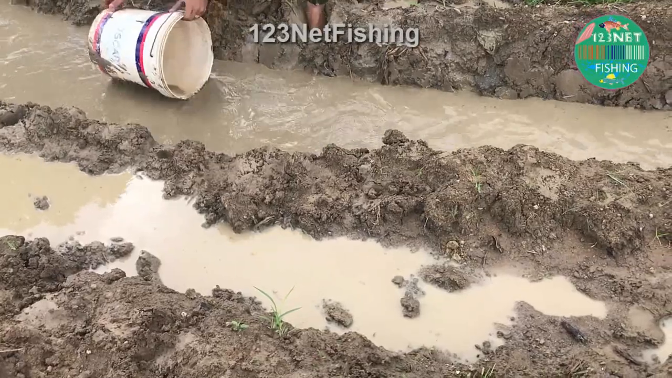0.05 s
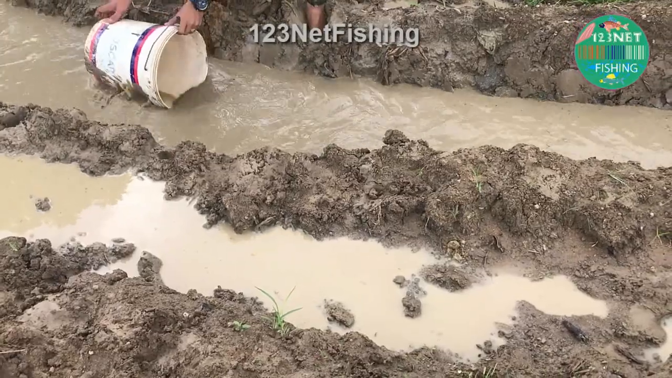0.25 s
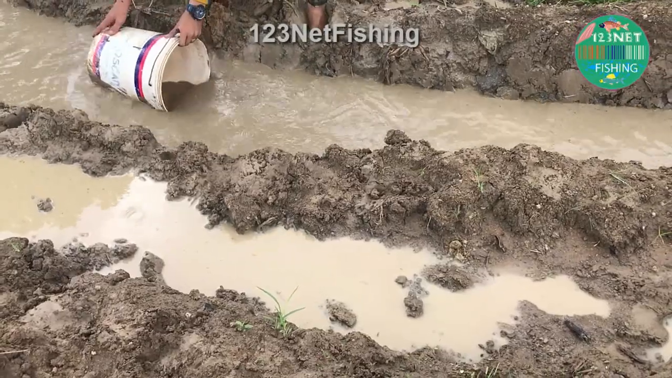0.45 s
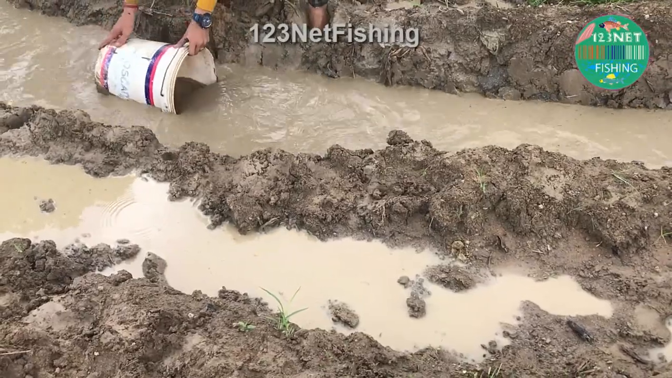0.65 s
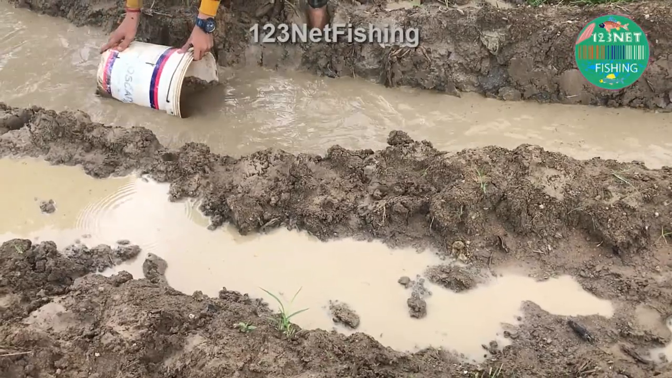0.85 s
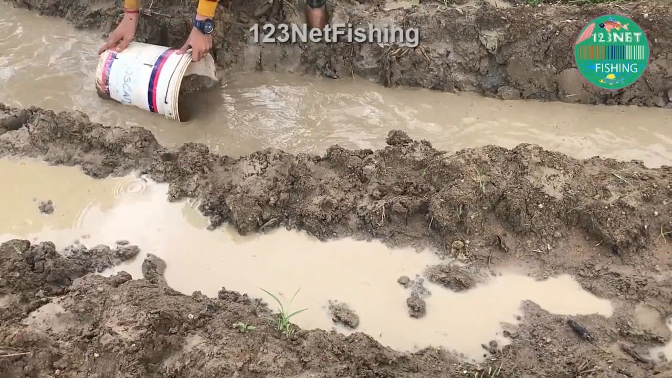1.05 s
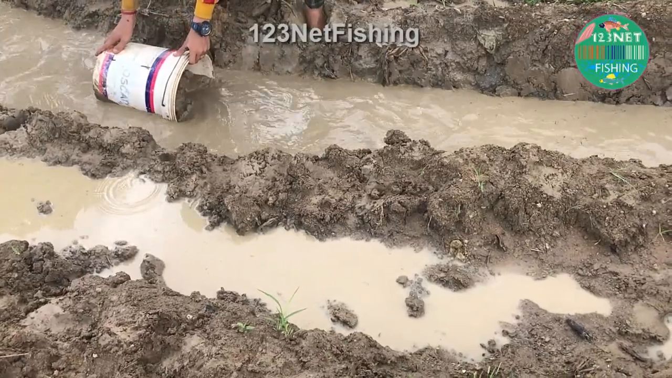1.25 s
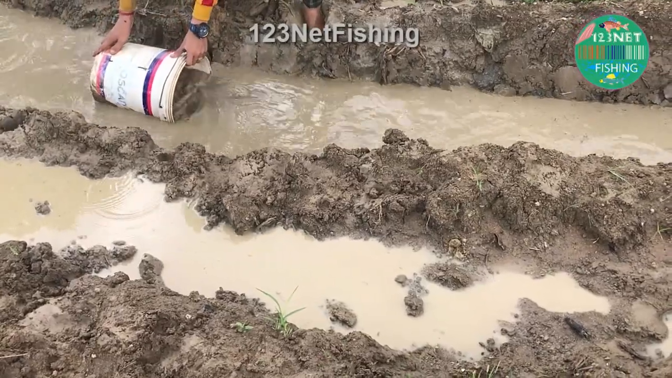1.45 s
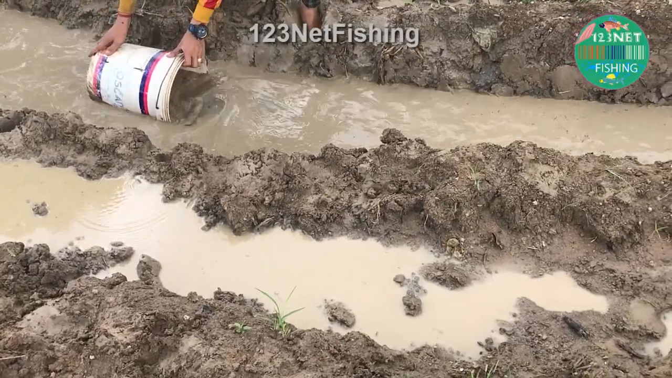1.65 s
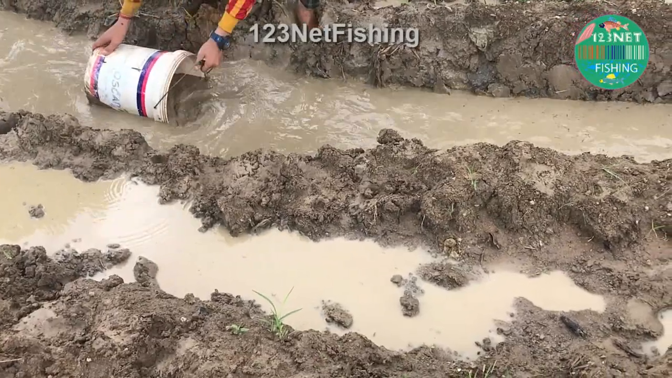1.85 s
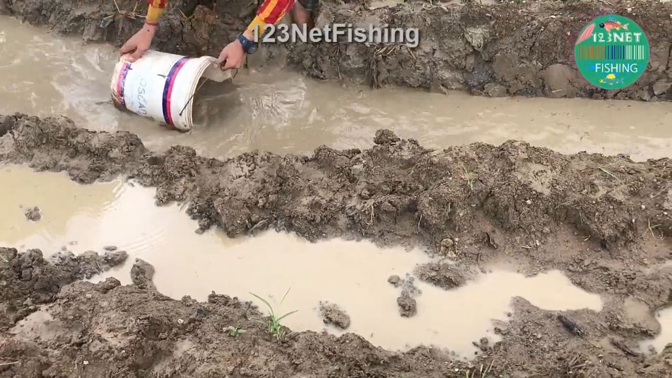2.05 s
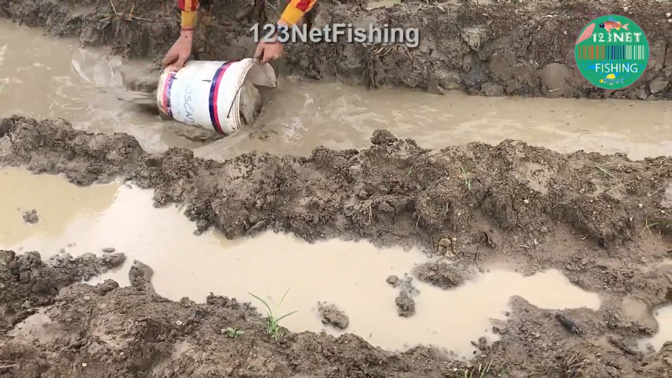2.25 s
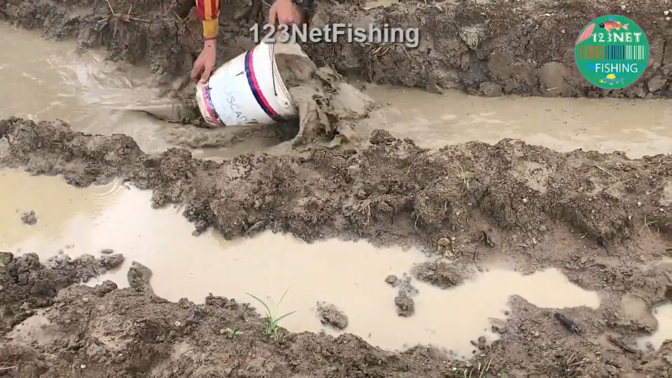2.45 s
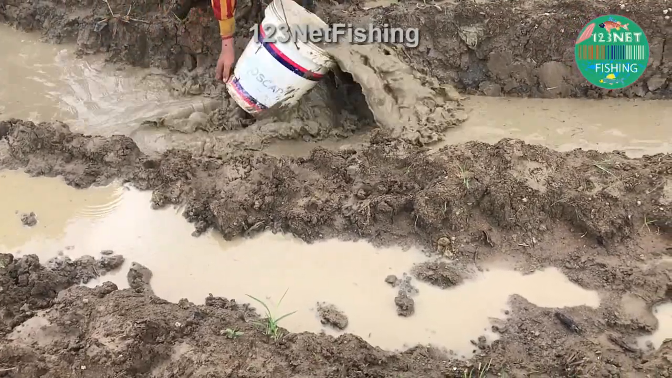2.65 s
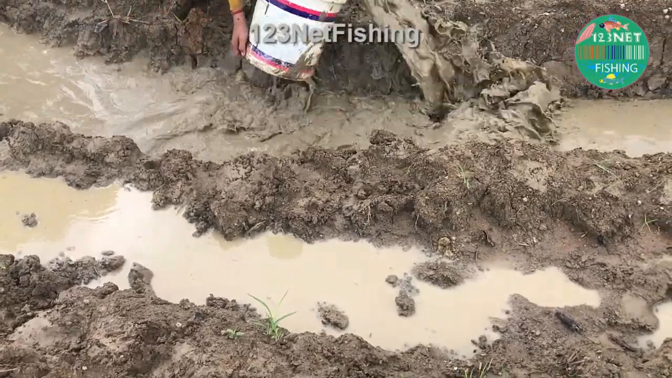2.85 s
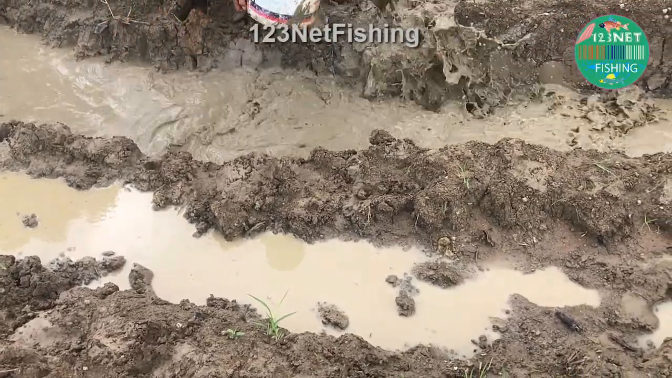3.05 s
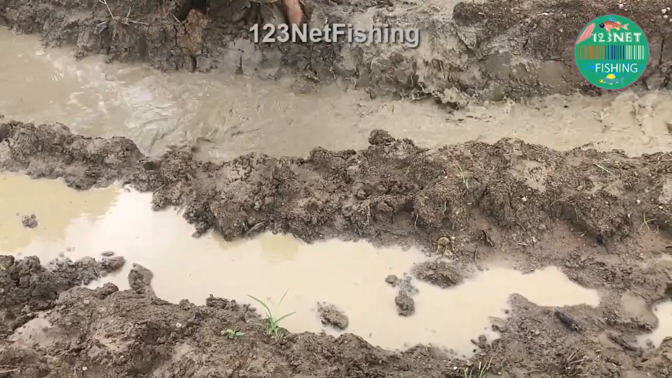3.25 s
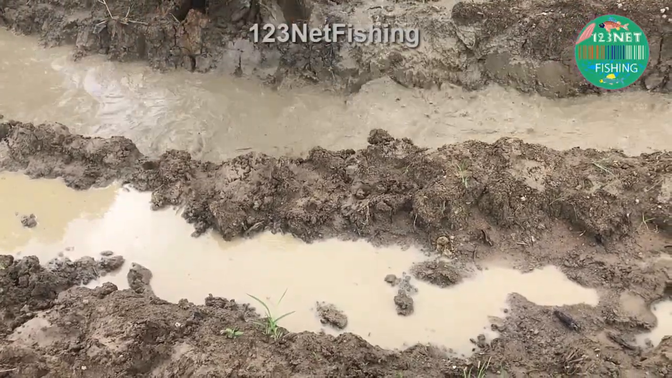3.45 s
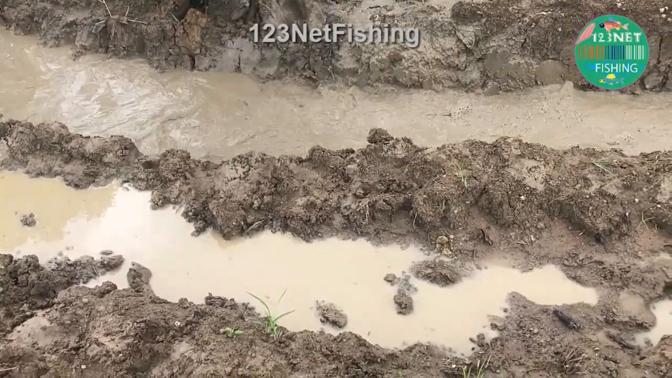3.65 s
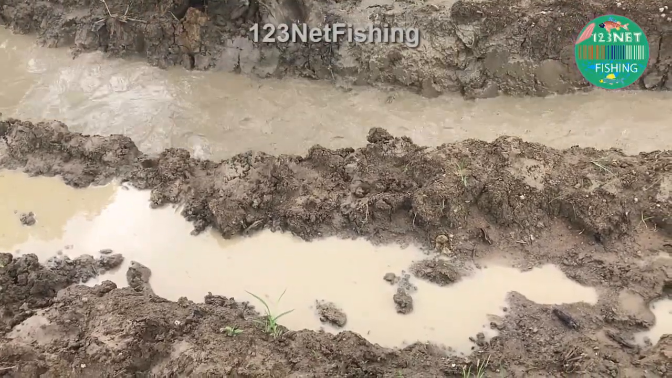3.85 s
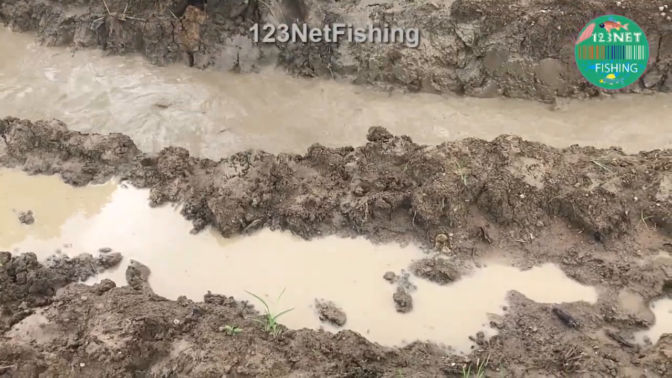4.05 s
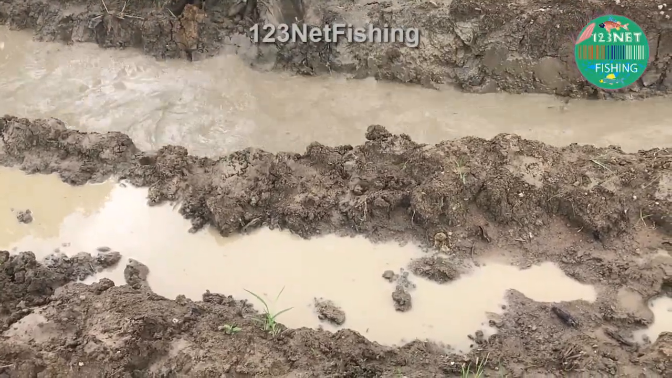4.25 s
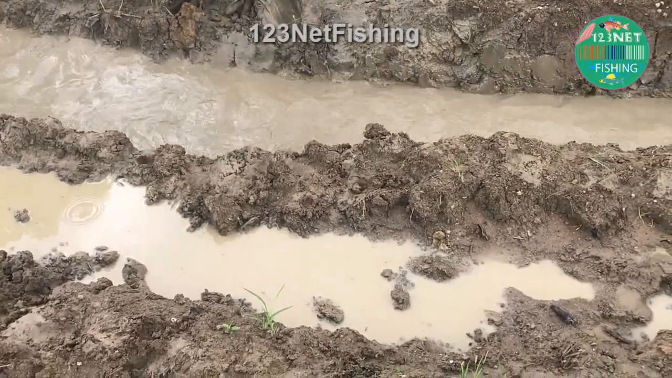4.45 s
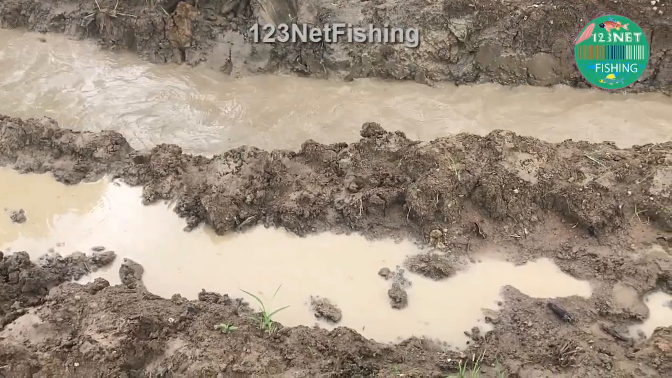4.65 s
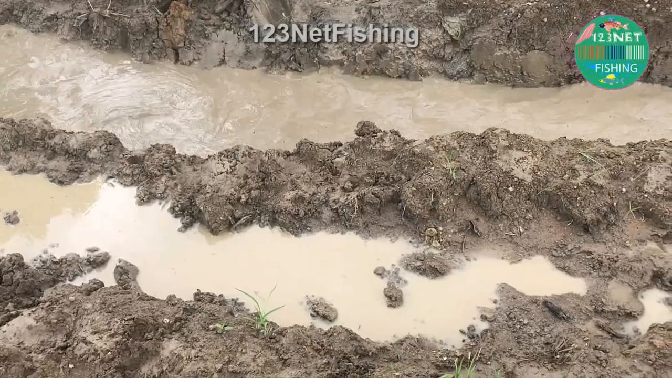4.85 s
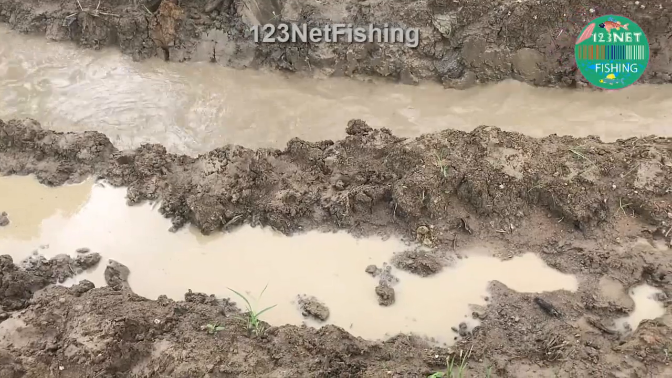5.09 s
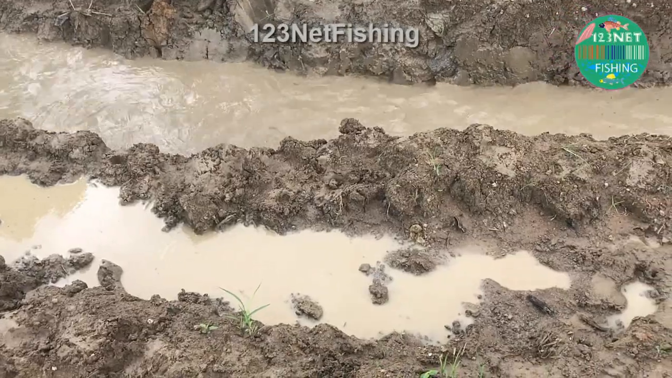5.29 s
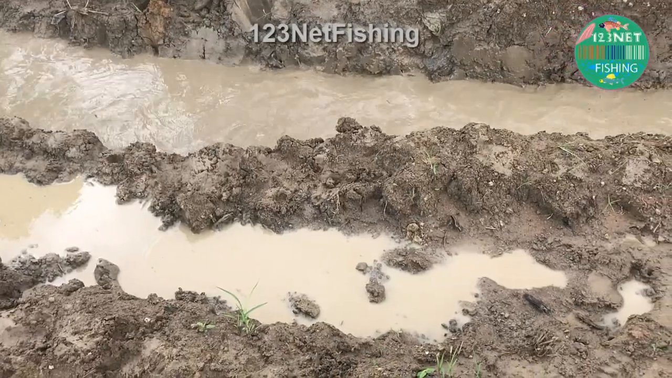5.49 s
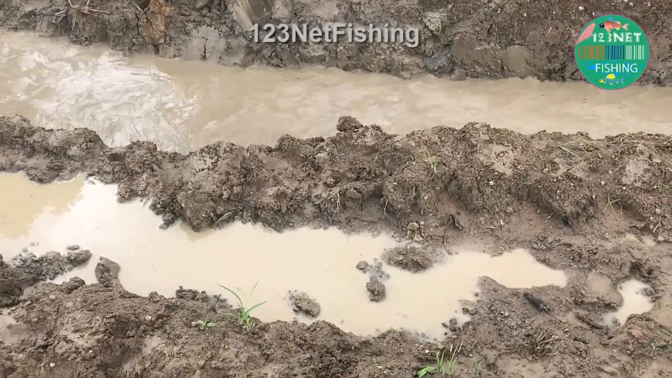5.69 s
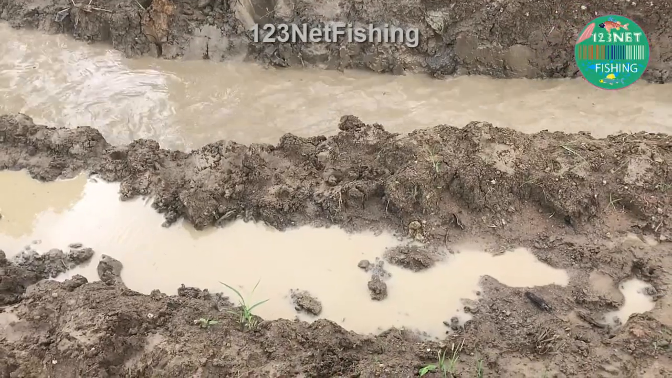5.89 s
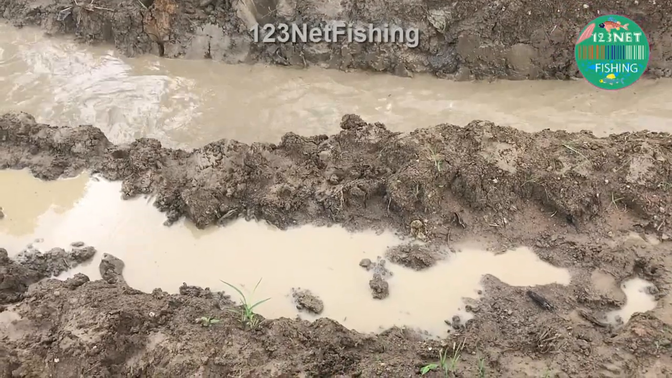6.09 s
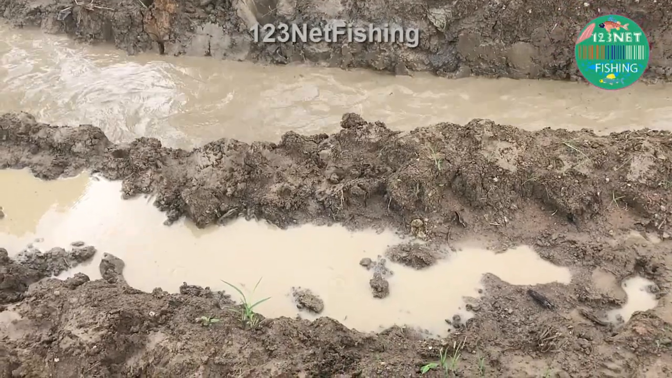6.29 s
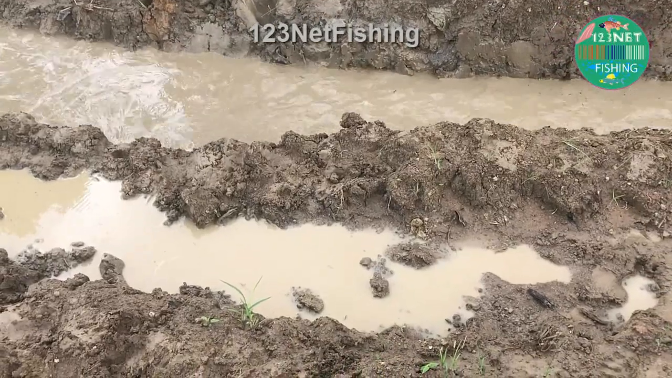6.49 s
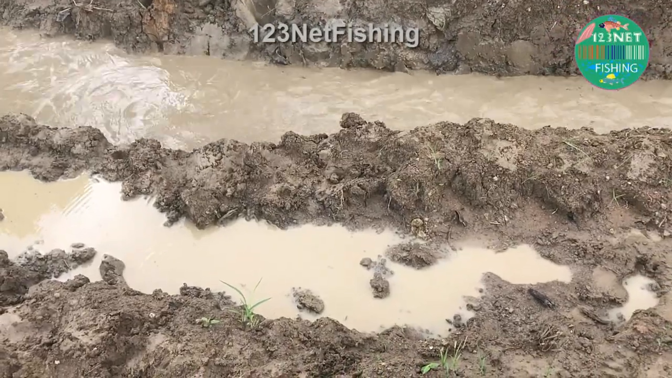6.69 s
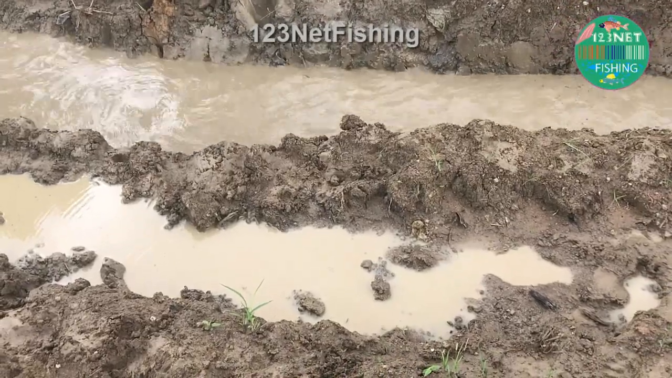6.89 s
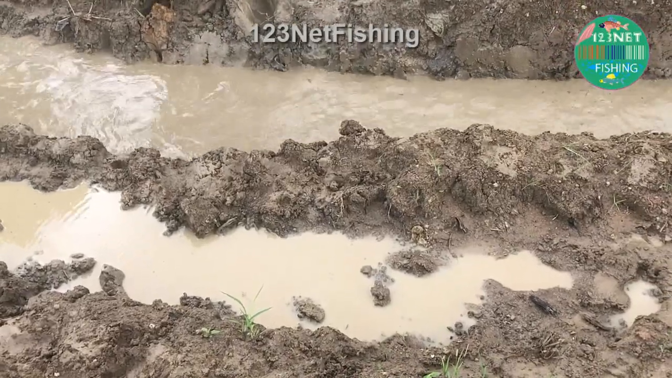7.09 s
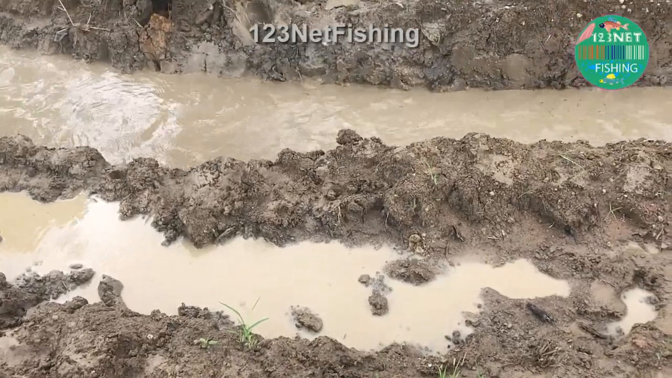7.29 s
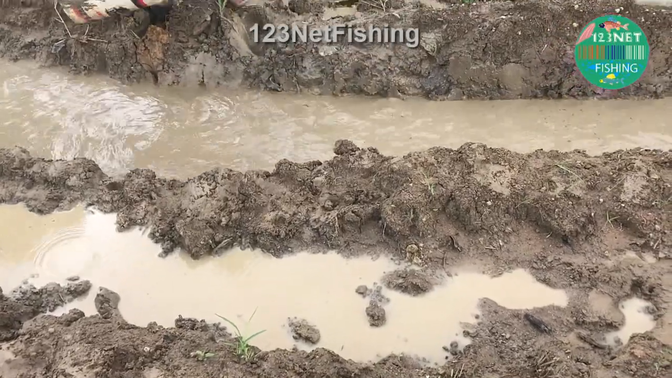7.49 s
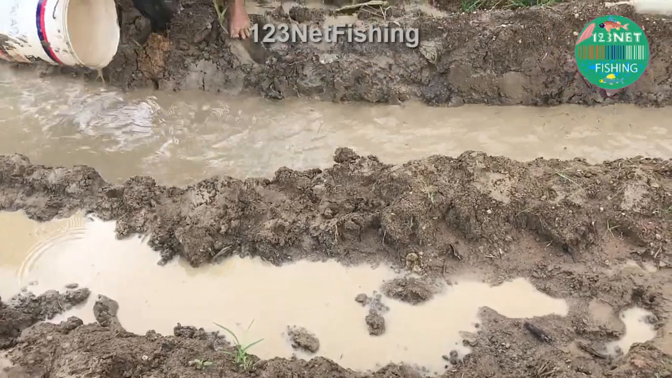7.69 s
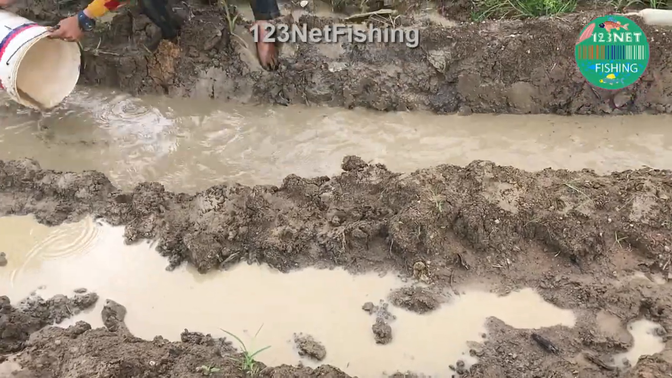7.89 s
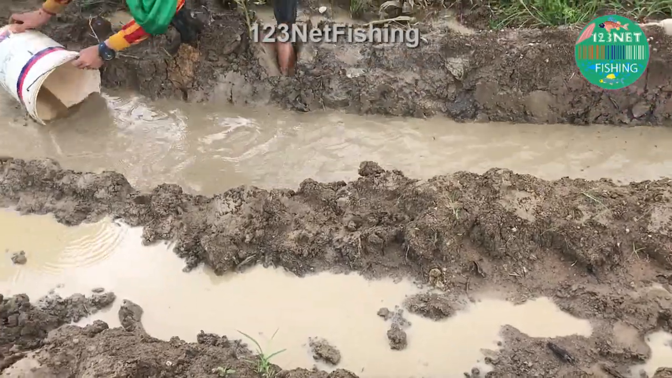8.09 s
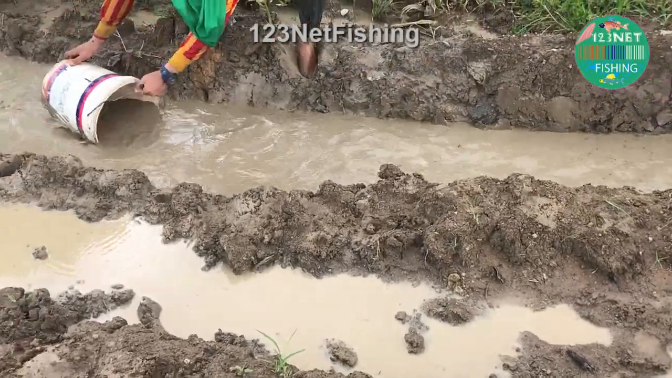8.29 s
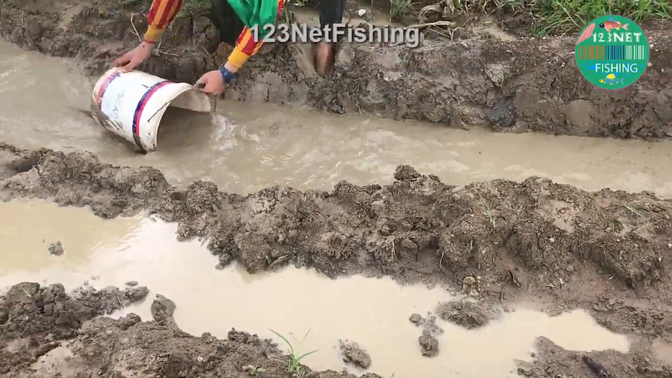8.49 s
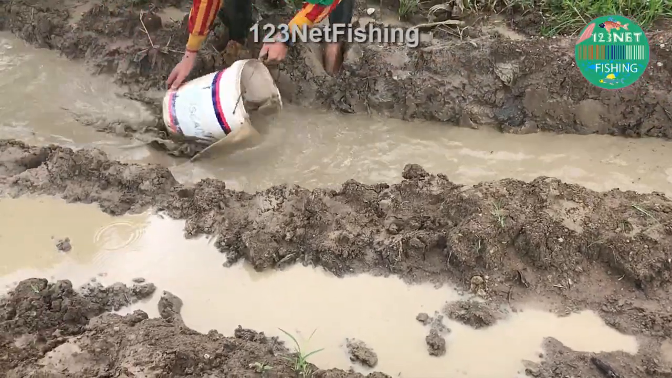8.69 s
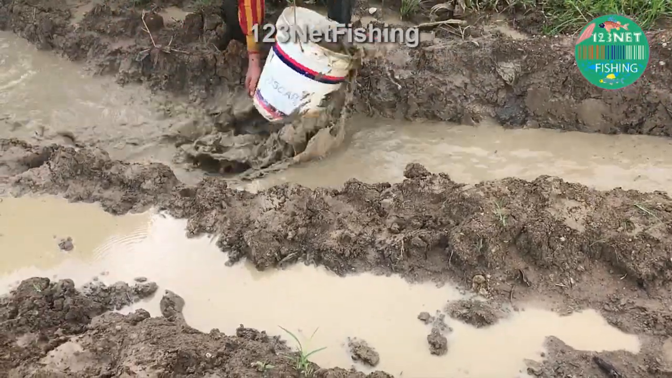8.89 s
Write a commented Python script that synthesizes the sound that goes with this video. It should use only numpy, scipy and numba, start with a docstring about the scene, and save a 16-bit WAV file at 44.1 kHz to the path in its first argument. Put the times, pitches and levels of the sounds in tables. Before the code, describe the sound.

Outdoors, a few metres from the microphone, a plastic bucket smacks into a muddy rut with a wind thump, then gurgles and plops as it fills. A heavy gush flings the water out, a second load lands further off with a hollow splash, and drips fade. Quiet follows with faint bird twitter and light bucket knocks, then the bucket slaps in again and scoops with a fresh gush.

```python
"""A plastic bucket bails muddy water along a shallow rut, outdoors, a few metres away.
It slaps in, gulps full and is flung empty; a second load lands further on, drips settle, and it dips in again.
The water is clouds of short bubbles under crackling spray, with single plops and noise-burst slaps.
The bucket knocks as a set of ringing modes and booms as a cloud of low bubbles.
Behind it small birds twitter in sliding tones, and filtered noise makes the open air and a gusting breeze."""
import sys
import numpy as np
from scipy import signal
from scipy.fft import rfft, irfft
from scipy.io import wavfile
from scipy.ndimage import uniform_filter1d
from numba import njit

SR = 44100
rng = np.random.default_rng(int(sys.argv[2]) if len(sys.argv) > 2 else 0)


def file_out(sig):
    """Save sig as 16-bit WAV at sys.argv[1]."""
    # one column per channel
    cols = np.atleast_2d(sig).T
    # limit, then scale
    lim = np.clip(cols, -1, 1)
    pcm = np.round(lim * 32767).astype(np.int16)
    wavfile.write(sys.argv[1], SR, pcm)


N = 394186
TIME = np.arange(N) / SR

# Surges of water, from bucket slaps, ploughing and flung loads to drips and dribbles; release falls 20 dB,
# before the pocket and spray factors below; a negative release cuts the hold short:
# start_s, attack_s, hold_s, release_s, bubbles_db, air_pockets_db, spray_db
SURGES = [(.064, .008, 0.014, .11, -47.5, -58.5, -53), (.17, .22, .33, 0.53, -62.5, -72, -71.5),
          (0.872, 0.041, 0.3393, .36, -54, -65.5, -58.5), (1.4, 0.093, 0.512, 4, -73.5, -81.5, -74.5),
          (2.079, 0.0047, .11, 0.05, -52, -63, -71.5), (2.187, 0.0365, 0.08, 0.77, -63, -74.5, -56.5),
          (2.23, 0.133, 0.252, 0.2925, -44, -56, -52), (2.57, .06, 0.2775, 0.3444, -38.8, -49, -47.5),
          (2.749, 0.1744, .27, .35, -43, -62, -46), (3.615, .035, .05, .29, -62.5, -88, -54.5),
          (3.901, 0.1505, 0.423, 0.23, -67, -86, -65.5), (4.214, .015, .03, 0.075, -57, -84.5, -56),
          (4.275, .025, .012, .08, -51, -82, -51.5), (4.507, .06, .02, 0.114, -64, -75, -53.5),
          (4.594, .012, .018, .07, -39.5, -48, -45.5), (4.61, .08, .17, .55, -43, -59.5, -46.5),
          (4.97, 0.139, .21, .09, -52, -73, -53), (6.649, 0.129, 0.0126, .14, -67, -79, -65),
          (7.608, 0.0196, 0.0124, .04, -54, -72, -50.5), (7.693, .15, .3, -0.05, -65.5, -83, -64),
          (8.029, .06, .51, 0.9, -57.5, -69, -66), (8.168, 0.0135, 0.0105, .07, -52, -68, -68.5),
          (8.308, .012, .06, .1, -46, -58, -60.5), (8.618, .045, 0.23, .2, -43, -49, -51),
          (8.85, .04, .05, .1, -42.5, -60, -51)]
RELEASE_CURVE = 1.224  # exponent: 1 is an exponential fall, more rounds the shoulder
POCKET_RELEASE, SPRAY_RELEASE = 0.77, 1.14  # ratio to the bubbles: glugs stop first, spray lingers
REST_BUBBLE_DB, REST_POCKET_DB, REST_SPRAY_DB = -82, -87, -77.5  # the rut between surges
# Relative tone of the bubbles: frequency_hz, level_db
BUBBLE_COLOUR = [(300, -19.5), (550, -20), (800, -3.5), (1050, 3), (1500, 4), (2200, 2.5), (3000, 0),
                 (4200, -6.5), (7000, -71.5)]
# Relative tone of the spray: frequency_hz, level_db
SPRAY_COLOUR = [(300, -19), (800, -38), (2000, 2), (3300, -3.5), (4500, -3.5), (5900, 0.5), (7600, -4),
                (9200, -2), (12000, -1), (15500, -5)]
# Single plops: start_s, level_db (peak of the main bubble), pitch_hz (at the start), ringing_cycles (27 dB fall)
PLOPS = [(.088, -27.5, 1280, 9), (.097, -29, 1190, 12), (.118, -27.5, 1620, 10), (.133, -34, 1920, 12),
         (.188, -46, 2540, 9), (.281, -50, 950, 10), (.318, -35, 1170, 6), (.348, -40, 1210, 10),
         (.414, -36, 1260, 10), (.503, -36.5, 1460, 13), (.555, -45, 1590, 10), (.572, -44, 980, 11),
         (.648, -53, 1090, 7), (.833, -36.5, 1700, 14), (.93, -44, 195, 5), (1.022, -38.5, 1683, 8),
         (1.047, -36.5, 205, 7), (1.122, -35.5, 960, 6), (1.281, -39.5, 1190, 14), (1.342, -48, 266, 11),
         (1.507, -40.5, 1416, 10), (1.728, -37.5, 1830, 7), (2.08, -31, 1320, 4), (2.254, -40.5, 374, 6),
         (2.289, -41, 1320, 25), (2.367, -35.5, 273, 13), (2.381, -30, 1260, 18), (2.406, -30.5, 1260, 10),
         (2.431, -35, 526, 8), (2.448, -32, 1396, 10), (2.671, -39, 358, 14), (2.732, -27, 1230, 7),
         (2.752, -24, 1540, 6), (2.765, -34.5, 385, 8), (3.097, -45, 210, 6), (3.347, -39.5, 1320, 15),
         (3.405, -31.5, 1480, 14), (3.518, -42, 1140, 14), (3.664, -39.5, 1320, 23), (3.697, -41, 1430, 11),
         (3.786, -39, 1940, 8), (4.009, -47, 988, 10), (4.089, -47, 1420, 10), (4.226, -36.5, 1545, 17),
         (4.247, -36.5, 1464, 10), (4.449, -49.5, 1930, 10), (5.634, -50, 1210, 8), (5.864, -52, 1580, 8),
         (7.261, -50, 1558, 8), (8.174, -41.5, 960, 5), (8.258, -35.5, 696, 5), (8.26, -37.5, 1390, 22),
         (8.352, -30, 1020, 5), (8.371, -33.5, 840, 5), (8.398, -29.5, 1250, 8), (8.419, -36, 1510, 14),
         (8.619, -31.5, 760, 28), (8.648, -36, 455, 7), (8.889, -29, 1115, 18), (8.928, -32, 1170, 15)]
# Wet slaps, smacks and drips on water and mud, before the slap tone:
# start_s, level_db (rms at the onset), t60_s, brightness_hz
SLAPS = [(.068, -26, 0.0317, 7000), (.087, -20.5, .011, 6000), (0.17, -47, 0.0254, 7000),
         (.833, -39.5, 0.0393, 2500), (2.138, -39, 0.063, 7000), (2.62, -28.5, 0.0355, 7000),
         (3.397, -29.5, 0.0092, 5000), (3.621, -42, 0.076, 5000), (3.83, -43.5, 0.0198, 3000),
         (3.888, -42, .006, 12000), (4.089, -42, 0.0227, 3500), (4.194, -42, .018, 6000),
         (4.249, -32, 0.0326, 5030), (4.295, -41, 0.0305, 5000), (4.605, -28, .035, 3500),
         (5.355, -38.5, .06, 3200), (5.441, -49, 0.063, 3541), (5.562, -43, 0.0393, 3000),
         (5.635, -49, 0.0337, 2500), (5.698, -53, 0.0257, 3000), (5.856, -50, 0.053, 2980),
         (6.849, -43.5, 0.0171, 7000), (7.876, -33, 0.0235, 3994), (8.03, -34, .04, 4500),
         (8.124, -31.5, .026, 8000), (8.183, -38.5, 0.079, 3000), (8.32, -31, .045, 3000),
         (8.459, -39, .009, 3500), (8.53, -45, .04, 4000), (8.677, -26.5, 0.0463, 6000)]
# Relative tone of the slaps: frequency_hz, level_db
SLAP_COLOUR = [(150, -4), (500, -18), (1100, -5), (2600, 4.5), (4500, 0.5), (6000, 2.5), (9000, 2),
               (15500, 7.5)]
# Span when the second load lands behind the bank: start_s, end_s
BEHIND_BANK_S = (4.56, 5.5)
# Relative hollow tone behind the bank: frequency_hz, level_db
BANK_COLOUR = [(90, -4), (170, 7.5), (250, -1), (345, 1), (455, -7), (620, 9), (800, 1.5), (1050, 0.5),
               (2400, 3.5), (2900, -3.5), (3600, 3), (6000, 1.5), (15000, 0)]
# Knocks on the bucket: start_s, level_db (relative), contact_brightness_hz
KNOCKS = [(0.087, -27, 500), (1.786, -34.5, 1840), (1.828, -41.5, 1400), (1.88, -48.5, 1400),
          (6.143, -54.5, 700), (6.333, -52.5, 1095), (6.783, -45, 1182), (7.008, -37.5, 1111)]
# Modes of the bucket's wall and cavity, varied a little per knock: pitch_hz, level_db (relative), t60_s
BUCKET = [(237.4, -7.5, 0.0865), (367, 1, 0.0235), (672, -6, 0.0457), (828.4, 3, 0.0347), (954, 7, 0.023),
          (1234, 2.5, 0.0286), (1590, 3.5, 0.0242), (2100, -4.5, 0.055)]
# Booms while the bucket's mouth is in the water: start_s, end_s, level_db (at the middle)
DIPS = [(0.08, 1.5, -60.5), (8.0, 9.3, -58.5)]
# Runs of falling bird notes: start_s, end_s, spacing_s, pitch_hz (mid-note), level_db (relative)
TWITTER = [(.205, .55, .062, 6520, -67.5), (0.567, .81, 0.0432, 7000, -67.5),
           (1.567, 1.7, 0.054, 6610, -70.5), (1.722, 1.89, 0.0432, 6800, -71),
           (1.91, 2.12, 0.0557, 6770, -62.5), (3.919, 4.4, 0.039, 6910, -70),
           (5.431, 5.59, 0.0474, 6870, -62), (6.287, 6.57, 0.043, 6960, -69.5),
           (6.576, 6.73, .061, 6837, -60), (6.88, 7.5, 0.0337, 4946, -76),
           (7.404, 7.65, 0.0404, 6870, -69.5), (7.691, 7.85, 0.064, 6770, -60)]
# Gusts on the microphone, release falls 20 dB: start_s, attack_s, hold_s, release_s, level_db
GUSTS = [(0, 0.0082, 0.041, 0.1325, -41.5), (0.114, 0.163, 0.049, 0.4943, -47.5),
         (0.883, 0.058, 0.159, 0.2871, -55), (2.15, 0.115, 0.048, 0.34, -69.5),
         (2.6, 0.254, .03, 0.28, -59), (3.663, .07, 0.0314, 0.15, -60.5), (7.35, 0.0275, 0.024, 0.22, -67),
         (8.8, 0.092, .03, .08, -67)]
LULL_DB = -77.5  # the breeze between gusts
# Relative tone of the open field: frequency_hz, level_db
FIELD = [(20, -11.5), (55, -3), (100, -1), (200, -2), (320, -4.5), (550, -12), (1100, -5), (2000, -18),
         (4000, -14.5), (6500, -16.5), (8000, -22), (15500, -20)]
FIELD_DB = -74
# Narrow dips of the microphone port: frequency_hz, width_hz, depth (0-1)
PORT_DIPS = [(4978, 127, 0.4), (7700, 800, 0.37), (10466, 250, 0.9)]
TOP_HZ = 15700


def stirring():
    """Levels in dB of bubbles, air pockets and spray: surges add their power to the resting water."""
    bubbles = undb(REST_BUBBLE_DB) ** 2
    pockets = undb(REST_POCKET_DB) ** 2
    drops = undb(REST_SPRAY_DB) ** 2
    for s, attack, hold, release, bubble_db, pocket_db, spray_db in SURGES:
        bubbles = bubbles + (undb(bubble_db) * swell(s, attack, hold, release)) ** 2
        pockets = pockets + (undb(pocket_db) * swell(s, attack, hold, release * POCKET_RELEASE)) ** 2
        drops = drops + (undb(spray_db) * swell(s, attack, hold, release * SPRAY_RELEASE)) ** 2
    return 10 * np.log10([bubbles, pockets, drops])


def churn(bubble_db, pocket_db, spray_db):
    """Sloshing makes scattered bubbles that crowd into a wash as spray rises; air pockets glug below."""
    gush = np.clip((spray_db + 73) / 13, .3, .97)
    # mud damps the bubbles within a few cycles
    few = cloud(count=4600, low_hz=550, high_hz=3800, cycles=8, spread_db=5, glide=.2)
    few = steady(colour(few, BUBBLE_COLOUR), 0.058)
    many = cloud(count=26000, low_hz=486.47, high_hz=4573, cycles=12.13, spread_db=4.0, glide=0.27)
    many = steady(colour(many, BUBBLE_COLOUR), 0.0286)
    many = many * undb(1.31 * clumps(0.0072) - 0.7949)
    pockets = cloud(count=1700, low_hz=243, high_hz=610, cycles=4.59, spread_db=5.0, glide=0.228)
    highpass = signal.butter(3, 200, "high", fs=SR, output="sos")
    pockets = steady(signal.sosfilt(highpass, pockets), 0.04)
    bubbles = np.sqrt(1 - gush) * few + np.sqrt(gush) * many
    return bubbles * undb(bubble_db) + pockets * undb(pocket_db)


def spray(spray_db):
    """Separate drops spatter in millisecond bursts; in a gush they merge into crackle and fizz."""
    gush = np.clip((spray_db + 69) / 19, .3, .92)
    burst = np.exp(-TIME[:SR // 40] / 0.0068)
    spatter_power = signal.oaconvolve(ticks(330, 6.75) ** 2, burst)[:N]
    spatter = np.sqrt(np.abs(spatter_power)) * rng.standard_normal(N)
    pings = cloud(count=3600, low_hz=2200, high_hz=11000, cycles=13, spread_db=5, glide=.12)
    fizz = cloud(count=26000, low_hz=2474.6, high_hz=13450, cycles=28, spread_db=2.5, glide=0.183)
    sparse = steady(spatter, 0.154) + undb(-3.5) * steady(pings, 0.27)
    dense = steady(ticks(7000, 4.61), 0.15) + undb(-4.0) * steady(fizz, 0.047)
    mixed = np.sqrt(1 - gush) * sparse + np.sqrt(gush) * dense
    return colour(mixed, SPRAY_COLOUR) * undb(spray_db)


def plops():
    """A cavity closes and rings; three quieter satellite bubbles follow within milliseconds."""
    s, db, hz, cycles = np.transpose(PLOPS)
    out = ring_bubbles(s.copy(), hz.copy(), cycles.copy(), undb(db), np.full(len(s), .2), 1.136)
    for _ in range(3):
        lag, pitch, rise = rng.random((len(s), 3)).T
        satellite_hz = hz * 2 ** (1.3 * pitch - .45)
        out += ring_bubbles(s + 0.01 * lag, satellite_hz, cycles.copy(), undb(db - 10.0), 0.521 * rise, 1.51)
    return out


def slaps():
    """Water hits flat and tears into a quick burst of drops; soft mud dulls the burst."""
    out, t = np.zeros(N), TIME[:SR // 8]
    for s, db, t60, bright_hz in SLAPS:
        # the level jumps at random every 24 samples, for a torn grain
        lumps = np.repeat(rng.uniform(-1, 1, len(t)), 24)[:len(t)]
        burst = rng.standard_normal(len(t)) * undb(6.5 * lumps)
        lowpass = signal.butter(1, min(bright_hz, SR / 3), fs=SR)
        burst = signal.lfilter(*lowpass, burst)
        onset = 1 - np.exp(-t / .001)
        add(out, s, burst / np.std(burst) * undb(db - 60 * t / t60) * onset)
    return colour(out, SLAP_COLOUR)


def behind_bank(water):
    """The bank hollows the tone of all the water while the second load lands."""
    start, end = BEHIND_BANK_S
    far = uniform_filter1d(1. * ((TIME > start) & (TIME < end)), size=1500)
    return water * (1 - far) + colour(water * far, BANK_COLOUR)


def knocks():
    """The wet plastic rings briefly; a soft contact leaves the high modes quiet."""
    out, t = np.zeros(N), TIME[:SR // 5]
    for s, db, bright_hz in KNOCKS:
        ring = 0
        for hz, mode_db, t60 in BUCKET:
            softness = np.hypot(1, (hz / bright_hz) ** 2)
            struck = undb(mode_db + 0.5 * rng.standard_normal() - 60 * t / t60) / softness
            mode_hz = hz * (1 + 0.0165 * rng.standard_normal())
            ring = ring + struck * np.sin(2 * np.pi * (mode_hz * t + rng.random()))
        add(out, s, ring * undb(db - 6.5) * (1 - np.exp(-t / 0.001)))
    return out


def boom():
    """Water lapping in the mouth of the half-sunk bucket sounds the air inside as low bubbles."""
    air = cloud(count=500, low_hz=152, high_hz=212, cycles=7.3, spread_db=7, glide=0.263)
    air = steady(air, 0.446)
    out = np.zeros(N)
    for start, end, db in DIPS:
        progress = np.clip((TIME - start) / (end - start), 0, 1)
        out += air * undb(db) * np.sin(np.pi * progress)
    return out


def birds():
    """Distant twitter: each thin note slides down with a quaver, never quite in time."""
    out = np.zeros(N)
    for start, end, spacing, hz, db in TWITTER:
        for s in np.arange(start, end, spacing):
            u = np.linspace(0, 1, int(.9 * spacing * SR))  # progress through the note
            late, sharp, loud = rng.standard_normal(3)
            quaver = uniform_filter1d(rng.standard_normal(SR // 8), size=40)[:len(u)]
            # longer notes slide further
            pitch = hz * (1 + .008 * sharp + 2.8 * spacing * (.5 - u) + .08 * quaver)
            tone = np.sin(2 * np.pi * np.cumsum(pitch) / SR)
            add(out, s + .003 * late, tone * np.sin(np.pi * u) * undb(db - 4.5 + 2 * loud))
    return out


def breeze():
    """Uneven eddies buffet the microphone with a low, throbbing rumble that comes in gusts."""
    rumble = [(20, -26.5), (36, -1), (56, -0.5), (80, -4.5), (120, -15.0), (250, -33), (1000, -79.5)]
    eddies = colour(rng.standard_normal(N + SR), rumble)[SR:]  # drop the filter's run-in
    power = undb(LULL_DB) ** 2
    for s, attack, hold, release, db in GUSTS:
        power = power + (undb(db) * swell(s, attack, hold, release)) ** 2
    return steady(eddies, 0.0444) * np.sqrt(power)


def open_field():
    """A steady hush of coloured noise fills the open air."""
    return colour(rng.standard_normal(N), FIELD) * undb(FIELD_DB)


def scatter(x, t60, wet_db):
    """Earth banks throw back a short, dull, diffuse echo."""
    t = TIME[:SR // 2]
    tail = colour(rng.standard_normal(len(t)), [(200, 6.0), (2000, 0), (12000, -10.5)])
    tail = tail * undb(-60 * t / t60) * (t > .004)
    return x + undb(wet_db) * signal.oaconvolve(x, tail / np.linalg.norm(tail))[:N]


@njit
def ring_bubbles(times, hz, cycles, size, glide, swell):
    """Each bubble swells as its neck closes, then dies away, rising in pitch towards the surface."""
    out = np.zeros(N)
    for k in range(len(times)):
        start, life = max(int(times[k] * SR), 0), cycles[k] * SR / hz[k]
        phase, gain, fade = 0., size[k], np.exp(-np.pi / life)
        for i in range(min(int(2 * life + swell * SR / hz[k]), N - start)):
            phase += 2 * np.pi * hz[k] / SR * (1 + glide[k] * i / life)
            opening = phase / (2 * np.pi * swell)  # swell is counted in cycles
            if opening < 1:
                out[start + i] += gain * opening * opening * (3 - 2 * opening) * np.sin(phase)
            else:
                gain *= fade
                out[start + i] += gain * np.sin(phase)
    return out


def cloud(count, low_hz, high_hz, cycles, spread_db, glide):
    """Bubbles of many sizes at random moments; a few are much louder than the rest."""
    when, pitch, life, loud, rise = rng.random((count, 5)).T
    hz = low_hz * (high_hz / low_hz) ** pitch
    size = undb(-spread_db * np.log(1 - .99 * loud))
    return ring_bubbles(when * N / SR, hz, cycles * 2 ** (2 * life - 1), size, glide * rise, 0.915)


def ticks(per_second, spread_db):
    """Random single-sample impacts of either sign, most of them small."""
    chance, loud, sign = rng.random((3, N))
    size = undb(-spread_db * np.log(1 - .99 * loud))
    return (chance < per_second / SR) * size * np.sign(sign - .5)


def clumps(span):
    """Water falls in uneven lumps: a smooth random drift, scaled to unit spread and clipped at 2."""
    size = int(span * SR) + 1
    drift = uniform_filter1d(uniform_filter1d(rng.standard_normal(N), size), size)
    return np.clip(drift / np.std(drift), -2, 2)


def swell(start, attack, hold, release):
    """Rise, hold, then fall by 20 dB in the release time."""
    out, t = np.zeros(N), TIME[:int((attack + hold + 3 * release) * SR)]
    falling = np.maximum(t - attack - hold, 0) / release
    add(out, start, np.minimum(t / attack, 1) * undb(-20 * falling ** RELEASE_CURVE))
    return out


def undb(db):
    """Decibels to gain."""
    return 10 ** (np.asarray(db) / 20)


def colour(x, points):
    """Causal minimum-phase filter shaped by (frequency_hz, level_db) points, scaled to unit power."""
    hz, db = np.transpose(points)
    size = 2048
    grid = np.log(np.fft.rfftfreq(size, 1 / SR) + 1)
    log_gain = np.log(undb(np.interp(grid, np.log(hz), db)))
    # folding the cepstrum forward in time gives minimum phase
    cepstrum = irfft(log_gain)
    cepstrum[1:size // 2] *= 2
    cepstrum[size // 2 + 1:] = 0
    response = irfft(np.exp(rfft(cepstrum)))
    return signal.oaconvolve(x, response / np.linalg.norm(response))[:len(x)]


def steady(x, span):
    """Bring the rms over about span seconds towards 1, leaving the faster grain alone."""
    size = int(span * SR) + 1
    power = uniform_filter1d(uniform_filter1d(x * x, size), size)
    return x / np.sqrt(np.abs(power) + np.mean(x * x) / 20)  # the floor spares quiet stretches


def add(out, s, sound):
    """Mix a sound in at time s in seconds."""
    start = max(int(s * SR), 0)
    out[start:start + len(sound)] += sound[:max(N - start, 0)]


def scene():
    """Water and bucket between the banks, birds further off, and the hush of the open field."""
    bubble_db, pocket_db, spray_db = stirring()
    water = churn(bubble_db, pocket_db, spray_db) + spray(spray_db) + plops() + slaps()
    bucket = knocks() + boom()
    near = scatter(behind_bank(water) + bucket, t60=0.085, wet_db=-16.5)
    far_birds = scatter(birds(), t60=.35, wet_db=-2)
    return (near + far_birds + breeze() + open_field())[None]


def record(dry):
    """The microphone port carves a few dips and the recorder cuts the top."""
    for hz, width_hz, depth in PORT_DIPS:
        notched = signal.lfilter(*signal.iirnotch(hz, hz / width_hz, fs=SR), dry)
        dry = dry + depth * (notched - dry)
    lowpass = signal.ellip(10, .2, 70, TOP_HZ, fs=SR, output="sos")
    return signal.sosfilt(lowpass, dry)


dry = scene()
out = record(dry)
file_out(out)
```